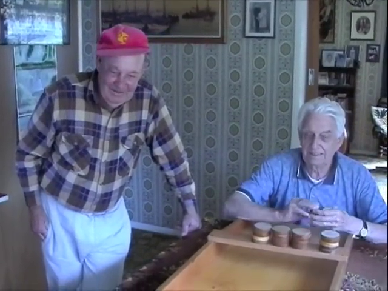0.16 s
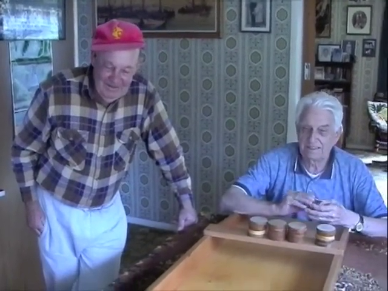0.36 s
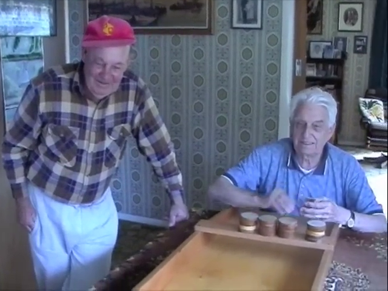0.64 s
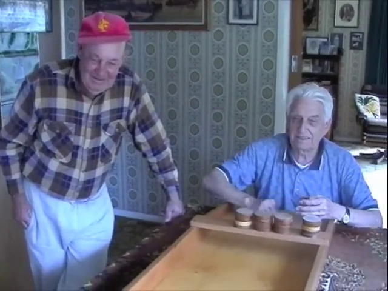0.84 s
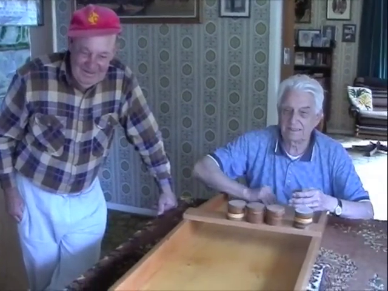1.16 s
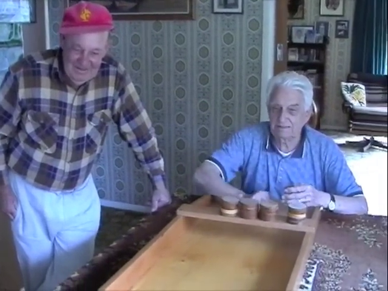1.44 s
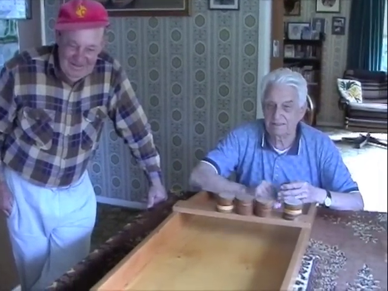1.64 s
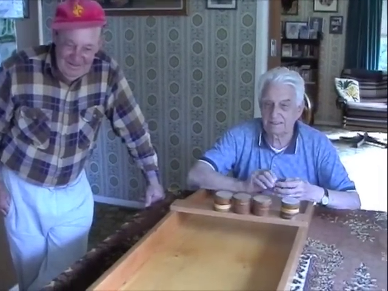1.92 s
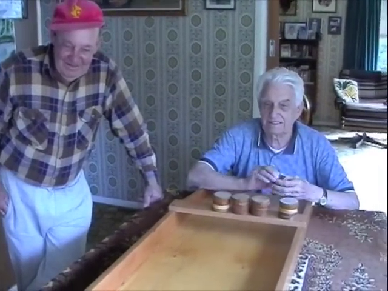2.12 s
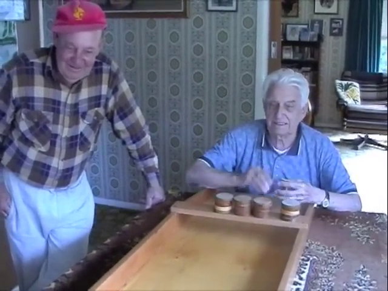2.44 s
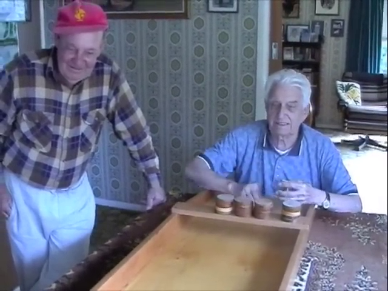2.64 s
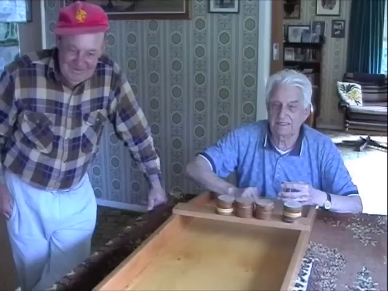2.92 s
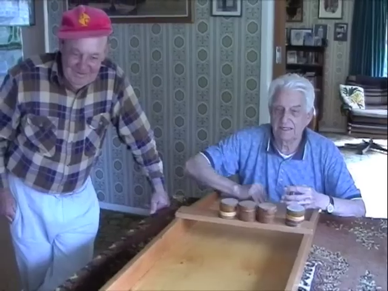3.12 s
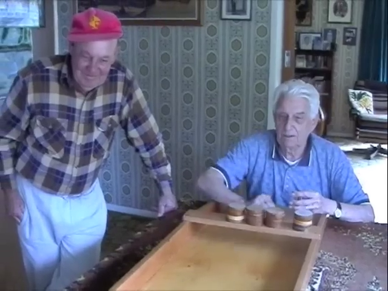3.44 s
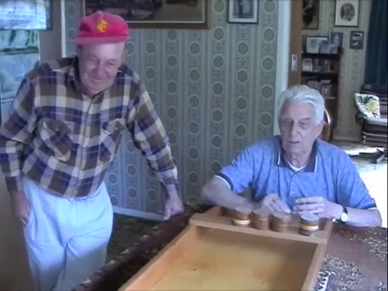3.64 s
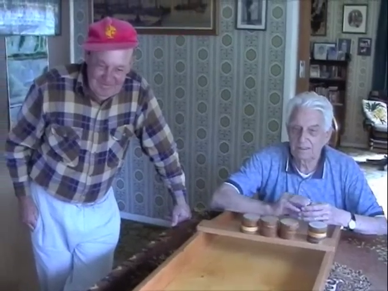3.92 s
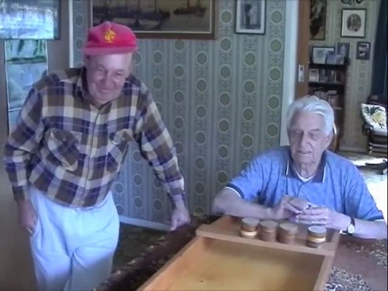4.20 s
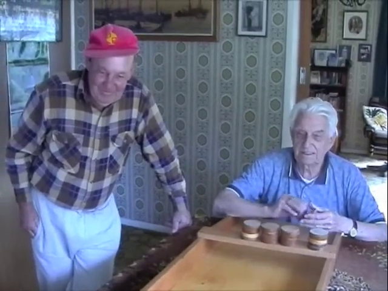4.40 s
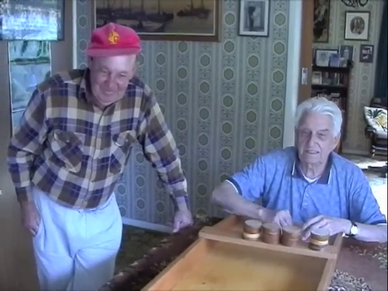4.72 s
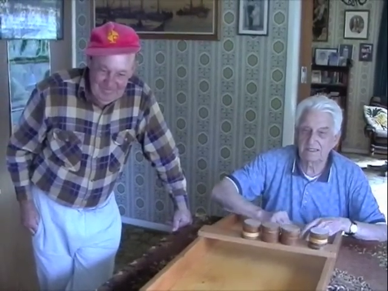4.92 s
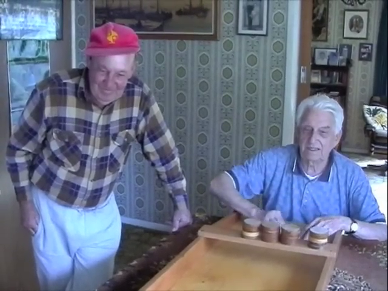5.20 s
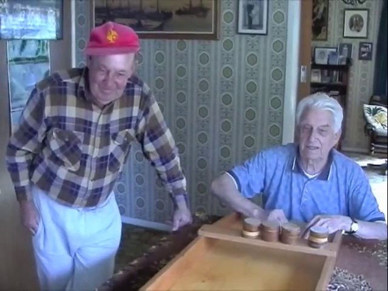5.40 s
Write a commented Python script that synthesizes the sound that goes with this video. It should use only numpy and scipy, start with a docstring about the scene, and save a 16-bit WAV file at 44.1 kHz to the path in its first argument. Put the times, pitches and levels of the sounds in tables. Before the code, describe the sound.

In a quiet living room, wooden game discs are set down with sharp clacks and pushed sliding along a long board, striking its end.

```python
"""Wooden discs on a long game board

A living room, in stereo, the board well ahead of its room tail. Discs are set down, dragged and pushed off.
Each blow is a filtered crack, then dying modes and noise of the board, and the soft tail of the room.
A sliding disc is grainy noise that hisses, wobbles and hits the far end; sleeves rustle over a quiet floor.
The camera limits the loudest peaks, and three times its sound cuts out for an instant."""
import sys
import numpy as np
from scipy import signal
from scipy.fft import rfft, irfft
from scipy.io import wavfile
from scipy.ndimage import uniform_filter1d, minimum_filter1d

SR = 44100
rng = np.random.default_rng(int(sys.argv[2]) if len(sys.argv) > 2 else 0)


def generate_wav(signal):
    """Clip the signal to [-1, 1] and save it as 16-bit WAV at the path in sys.argv[1]."""
    frames = np.transpose(np.atleast_2d(signal))
    scaled = np.clip(frames, -1, 1) * 32767
    pcm = np.round(scaled).astype(np.int16)
    wavfile.write(sys.argv[1], SR, pcm)


N = 245195
TIME = np.arange(N) / SR  # s


def amp(db):
    """Decibels to gain."""
    return 10 ** (np.asarray(db) / 20)


def evened(x):
    """Scales to rms 1."""
    return x / np.sqrt(np.mean(x ** 2) + 1e-20)


def read(points, hz):
    """Reads a table on a log-frequency axis."""
    f, value = np.transpose(points)
    return np.interp(np.log(hz + 1), np.log(f + 1), value)


def bins(x):
    """The frequencies of a signal's spectrum, in Hz."""
    return np.fft.rfftfreq(x.shape[-1], 1 / SR)


def coloured(x, db):
    """Filters by a gain in dB for each frequency."""
    return irfft(rfft(x) * amp(db), x.shape[-1])


def causal(x, db):
    """Filters by a gain in dB for each frequency, with no sound before the attack (minimum phase)."""
    log_gain = np.log(amp(np.r_[db, db[-2:0:-1]]))
    response = np.exp(signal.hilbert(log_gain).conj())[:len(db)]
    return irfft(rfft(x) * response)


def add(mix, s, sound):
    """Mixes a sound in at s seconds."""
    part = mix[:, max(round(s * SR), 0):][:, :sound.shape[1]]
    part += sound[:, :part.shape[1]]


def spread(pair, width):
    """Makes left and right from two unrelated signals, as mid and side."""
    mid = pair[0]
    side = coloured(pair[1], read(width, bins(pair)))
    return np.array([mid + side, mid - side])


def stroke(start, length, db, power):
    """Gain over one move of the hand, which speeds up and slows down in an arch."""
    along = np.clip((TIME - start) / length, 0, 1)
    return amp(db) * (4 * along * (1 - along)) ** power


# stereo width of wood, room tail and cloth: (f/Hz, side against mid level/dB)
SOUND_WIDTH = [(60, -37.5), (200, -12), (380, -29.5), (700, -17), (1300, -6.5), (2400, -4), (4400, -5.5),
               (8100, 1.5), (15000, -4)]


def tail(t60, size):
    """Stereo noise in which each band dies at its own speed."""
    noise = spread(rng.standard_normal((2, size)), SOUND_WIDTH)
    hz, t, z = signal.stft(noise, SR, nperseg=256)
    decay_db = -60 * t / np.maximum(read(t60, hz), .02)[:, None]
    return signal.istft(z * amp(decay_db), SR, nperseg=256)[1][:, :size]


# colour of the quiet room noise: (f/Hz, relative level/dB per Hz)
FLOOR_COLOUR = [(15, -36.5), (25, -3), (141, -7), (175, -8), (451, -3), (887, -12), (1160, -9.5),
                (2280, -15), (3340, -16.5), (6050, -19), (7310, -15.5), (8590, -18), (16000, -22.5)]
# stereo width of the room noise: (f/Hz, side against mid level/dB)
FLOOR_SIDE = [(60, 0), (400, -9), (1500, -1.5), (8000, 1.5)]
# the camera's own steady tones: (f/Hz, rms level/dB)
CAMERA_TONES = [(2099, -77.5), (2401, -76), (2848, -78), (3451, -74), (7499, -75), (10799, -76.5),
                (15622, -91)]
FLOOR_DB = -57  # rms


def background():
    """Steady coloured room noise with the thin whine of the camera, a few pure tones."""
    noise = spread(rng.standard_normal((2, N)), FLOOR_SIDE)
    floor = evened(coloured(noise, read(FLOOR_COLOUR, bins(noise))))
    whine = sum(amp(db) * np.sqrt(2) * np.sin(2 * np.pi * (hz * TIME + rng.random()))
                for hz, db in CAMERA_TONES)
    return amp(FLOOR_DB) * floor + whine


# decay of the room: (f/Hz, t60/s)
ROOM_DECAY = [(100, 0.27), (500, 0.65), (1500, 0.43), (4000, 0.39), (12000, 0.25)]


def room(x):
    """The soft tail of a furnished room: diffuse noise that builds up over some 9 ms, then dies."""
    response = tail(ROOM_DECAY, size=2 ** 15)
    response = response * (1 - np.exp(-(TIME[:response.shape[1]] / 0.009) ** 2))
    response = response / np.linalg.norm(response[0])
    return signal.fftconvolve(x.mean(0)[None], response, axes=1)[:, :N]


# colour of the cloth: (f/Hz, relative level/dB per Hz)
CLOTH_COLOUR = [(100, -23), (400, 12), (900, 3.5), (2500, -12), (8000, -27.5), (16000, -31.5)]
# a sleeve brushes the table: (start t/s, length t/s, level/dB)
SLEEVE_BRUSHES = [(0.364, 0.58, -60), (0.674, 0.52, -55.5), (2.68, 0.045, -54.5), (4.101, 0.51, -57.5)]


def sleeves():
    """A faint rustle of cloth: coloured noise that swells and fades with the speed of the arm."""
    noise = spread(rng.standard_normal((2, N)), SOUND_WIDTH)
    cloth = evened(coloured(noise, read(CLOTH_COLOUR, bins(noise))))
    return sum(stroke(*row, power=1) for row in SLEEVE_BRUSHES) * cloth


# the disc squeaks as it is pushed off, falling in pitch
SQUEAK_S, SQUEAK_LENGTH_S, SQUEAK_DB = 1.402, 0.027, -21.5
SQUEAK_FROM_HZ, SQUEAK_TO_HZ = 1600, 1107


def squeak():
    """Stick and slip: a short, rough, falling tone with its third harmonic."""
    hz = np.interp(TIME, [SQUEAK_S, SQUEAK_S + SQUEAK_LENGTH_S], [SQUEAK_FROM_HZ, SQUEAK_TO_HZ])
    jitter = .14 * evened(uniform_filter1d(rng.standard_normal(N), size=30))
    turns = np.cumsum(hz * (1 + jitter)) / SR
    tone = np.sin(2 * np.pi * turns) + amp(-9) * np.sin(2 * np.pi * 3 * turns)
    return stroke(SQUEAK_S, SQUEAK_LENGTH_S, SQUEAK_DB, power=1.1) * tone


# resonances of wood rubbing on wood: (f/Hz, width f/Hz, peak level/dB)
RUB_RESONANCES = [(705, 35, 7.5), (1340, 30, 6), (2040, 86, 2), (2516, 140, 4), (3520, 24, 10.5),
                  (4130, 91, 1), (4320, 26, 2)]


def rubbing(colour, per_s, grain_db, smooth):
    """Tiny collisions of the wood grain over a smooth hiss, through fixed resonances, in uneven patches."""
    size = amp(grain_db * np.minimum(rng.exponential(1, N), 5))
    collisions = evened(size * (rng.random(N) < per_s / SR))
    grains = collisions * rng.choice([-1, 1], (2, N))
    hiss = smooth * rng.standard_normal((2, N))
    hz, t, z = signal.stft(spread(grains + hiss, SOUND_WIDTH), SR, nperseg=512)
    peaks_db = sum(db / (1 + (2 * (hz - f) / width) ** 2) for f, width, db in RUB_RESONANCES)
    # random patches of frequency and time, louder or softer
    patches = uniform_filter1d(rng.standard_normal(z.shape[1:]), size=7, axis=0)
    patches_db = 2.2 * evened(uniform_filter1d(patches, size=7, axis=1))
    z = z * amp((read(colour, hz) + peaks_db)[:, None] + patches_db)
    return evened(signal.istft(z, SR, nperseg=512)[1][:, :N])


# colour of a disc rubbing under the fingers: (f/Hz, relative level/dB per Hz)
DRAG_TIMBRE = [(120, -48), (200, -24), (282, -17.5), (383, 0), (476, 4.5), (602, -21), (659, -2.5),
               (849, 1), (1040, 0), (1380, 2.5), (1850, -5), (4390, 1), (5550, -9), (7550, -8),
               (15000, -38)]
# a disc is dragged under the fingers: (start t/s, length t/s, relative level/dB)
DRAG_MOVES = [(1.15, .245, -34), (1.379, 0.12, -27.5), (2.95, .14, -40.5), (3.091, .2, -31),
              (3.227, 0.16, -30), (3.362, 0.079, -24), (4.823, 0.14, -39.5), (5.07, .16, -42.5),
              (5.465, 0.25, -33.5)]
DRAG_POWER = 1.63  # the arch of each move is raised to this power


def drags():
    """A disc held under the fingers gives a finer, even rasp that follows the speed of the hand."""
    rasp = rubbing(DRAG_TIMBRE, per_s=6400, grain_db=-1.5, smooth=0.57)
    return amp(-3.0) * rasp * sum(stroke(*row, DRAG_POWER) for row in DRAG_MOVES)


# a wobbling disc slaps its rim down ever faster: first slap, first interval, each interval against the last
WOBBLE_START_S, WOBBLE_PERIOD_S, WOBBLE_SHRINK = 1.494, .063, .935


def wobbles(count):
    """The moments at which the wobbling rim comes down."""
    intervals = WOBBLE_PERIOD_S * WOBBLE_SHRINK ** np.arange(count - 1)
    return WOBBLE_START_S + np.r_[0, np.cumsum(intervals)]


# loudness follows speed to these powers (treble share 0 and 1), so the hiss dies before the rumble
BASS_POWER, TREBLE_POWER = 0.73, 1.37
ROCK_S, ROCK_DB = .05, 3  # a slowing disc rocks, and its rumble throbs: period and greatest depth


def slide(t, treble_share, start, push, end, left, db, bright_db):
    """Gain by band and time of one slide: the disc gets up to speed, then friction slows it evenly."""
    slowed = np.clip(1 - left, 0, 1) * np.clip((t - start) / (end - start), 0, 1)
    speed = np.clip((t - start) / push, 0, 1) ** 2 * (1 - slowed) * (t < end)
    rock_db = ROCK_DB * np.sqrt(slowed) * np.cos(2 * np.pi * (end - t) / ROCK_S)
    power = BASS_POWER + (TREBLE_POWER - BASS_POWER) * treble_share
    level_db = db + treble_share * bright_db + (1 - treble_share) * rock_db
    return amp(level_db) * speed ** power


# colour of a freely sliding disc: (f/Hz, relative level/dB per Hz)
GLIDE_TIMBRE = [(40, -40.5), (150, -62), (260, -16), (420, 4), (750, 1), (1300, -2), (2500, -3.5),
                (4000, -1), (6200, -3.5), (7900, -1.5), (9800, -11), (11400, -21.5), (12900, -16.5),
                (15500, -56)]
# a disc slides freely: (start t/s, time to full speed t/s, end t/s, share of speed left at the end 0-1,
# relative level/dB, brightness level/dB)
FREE_SLIDES = [(0, 0.002, 0.31, 0.01, -25, -17), (1.39, .085, 1.86, 1, -28, -9),
               (1.864, 0.0085, 2.192, 0.07, -29, -11.5), (3.35, 0.034, 3.745, 0.47, -42.5, 6.5),
               (3.745, 0.065, 4.22, 0, -28.5, -7.5)]
WOBBLE_SWELL_DB = 7


def glides(slaps):
    """A free disc hisses while it is fast and rumbles as it slows; its wobble makes the sound throb."""
    rub = rubbing(GLIDE_TIMBRE, per_s=3000, grain_db=3, smooth=.55)
    hz, t, z = signal.stft(rub, SR, nperseg=256)
    treble_share = read([(800, 0.22), (2200, 0.63), (5500, 1)], hz)[:, None]
    gain = sum(slide(t, treble_share, *row) for row in FREE_SLIDES)
    sound = signal.istft(z * gain, SR, nperseg=256)[1][:, :N]
    wobble_db = WOBBLE_SWELL_DB * sum(np.exp(-((TIME - at) / .011) ** 2) for at in slaps)
    return sound * amp(8.0 + wobble_db)


WOBBLE_CHATTER_DB = -25.5  # strength of each tap


def chatter(slaps, count):
    """At each wobble the rim taps the board a few times in quick succession."""
    taps = np.zeros((2, N))
    for s in slaps:
        for delay in .006 * (np.arange(count) - rng.random(count) - .7):
            ping_hz = rng.uniform(1500, 5000)
            blow = knock(WOBBLE_CHATTER_DB, thump_db=-12.5, crack_db=2, tick_db=-4, ring_db=3.0, clack_hz=ping_hz)
            add(taps, s + delay, blow)
    return taps


# the wood right under the disc gives a hollow knock that dies fast: (f/Hz, relative level/dB, t60/s)
HOLLOW_MODES = [(460.3, -4, 0.14), (800, -3, 0.079), (1075, -5.5, 0.022), (1368, 3.5, 0.057)]


def hollow(t):
    """The brief, low knock at the place of the blow, a few modes of the wood."""
    hz, db, t60 = np.transpose(HOLLOW_MODES)[:, :, None]
    since = np.maximum(t - .045 / np.sqrt(hz), 0)  # slow bending waves arrive later
    level = amp(db - 60 * since / t60) * (1 - np.exp(-since * hz))
    return (level * np.sin(2 * np.pi * hz * since)).sum(0)


# decay of the board: (f/Hz, t60/s)
BOARD_DECAY = [(100, 0.6), (500, 0.21), (1800, 0.22), (4500, 0.15), (12000, 0.22)]


def ring(modes, t, scatter_db):
    """Dying modes; the place of the blow and the load of the discs change their shares and pitch a little."""
    hz, db = np.transpose(modes)[:, :, None]
    share, load = rng.standard_normal((2, len(hz), 1))
    hz = hz * (1 + .008 * load)
    level = amp(db + scatter_db * share - 60 * t / read(BOARD_DECAY, hz))
    return (level * np.sin(2 * np.pi * hz * t)).sum(0)


# the first crack of wood on wood: (f/Hz, relative level/dB per Hz)
CRACK_COLOUR = [(30, -46), (150, -25.5), (280, -7), (460, 3.5), (640, -2.5), (1200, -2), (1900, -3.5),
                (3000, -2.5), (4300, -4), (5800, -9.5), (8200, -25.5), (10500, -34), (13000, -52.5),
                (16000, -58)]
# lasting modes of the board, before scatter: (f/Hz, relative level/dB)
BOARD_MODES = [(422, -6), (475, -11.5), (560, -23), (680, -1), (780, -0.5), (852, -3.5), (935, -1.5),
               (1110, -2.5), (1251, -1), (1372, -2.5), (1535, -3.5), (1648, -6.5), (1985, -1.5),
               (2231, -10), (2635, -11.5), (2890, -14), (3480, -11), (3990, -12)]
# the board's crowd of weaker modes: (f/Hz, relative level/dB per Hz)
CLATTER_COLOUR = [(30, -35.5), (130, -32.5), (250, -17), (400, 5), (800, 4.5), (1400, -1.5), (2200, 0),
                  (3500, -6), (5500, -11.5), (8200, -20.5), (10500, -45), (13000, -58.5), (16000, -64.5)]


def knock(strength_db, thump_db, crack_db, tick_db, ring_db, clack_hz):
    """One blow: a short crack at the contact, then the modes of the whole board."""
    t = np.arange(2 ** 14) / SR
    hz = bins(t)
    # one clean impact and a few milliseconds of dying noise that roughens the crack
    impact = (t == 0) + amp(-20) * rng.standard_normal(len(t)) * np.exp(-t / .003)
    # bending waves run faster at high pitch, so the treble arrives first
    bent = irfft(rfft(impact) * np.exp(-2j * np.pi * 0.1193 * np.sqrt(hz)))
    clack_db = 8 / (1 + (np.log2((hz + 1) / clack_hz) / .17) ** 2)  # a peak, width in octaves
    contact = amp(31.0) * causal(bent, read(CRACK_COLOUR, hz) + clack_db)
    modes = ring(BOARD_MODES, t, scatter_db=2.5)
    board = amp(-10.0) * modes * (1 - np.exp(-t / 0.0014)) + amp(-7.5) * hollow(t)
    crowd = tail(BOARD_DECAY, size=len(t)) * (1 - np.exp(-t / 0.00035))
    clatter = amp(6.5) * causal(crowd, read(CLATTER_COLOUR, hz) + .5 * clack_db)
    hardness_db = read([(450, thump_db), (900, 0), (1700, 0.0013),
                        (3200, crack_db), (6000, crack_db), (9000, tick_db)], hz)
    sound = causal(contact + amp(ring_db) * (board + clatter), strength_db + hardness_db)
    return sound * np.minimum((t[-1] - t) / .05, 1)  # fade at the very end


# discs are set down or knocked together near the hand: (t/s, strength level/dB, thump near 400 Hz level/dB,
# hardness level/dB, after-ring level/dB, pitch of the clack f/Hz)
HAND_CLACKS = [(0.9435, -11.5, -1.5, -7.5, -1.5, 4130), (1.0496, -27.5, -2.5, -9, 3, 800),
               (1.09, -22, 0, -10.5, -2.5, 764), (1.11, -32, 0, -2.5, -7, 1210),
               (1.387, -39.5, -8, -12.5, -0.5, 1500), (2.737, -11, 0, -9.5, 1, 3570),
               (2.8803, -15, -2, 3.5, -3, 2570), (4.775, -8.5, -4.5, -5.5, -3.5, 1220),
               (4.937, -15, -1, 4.5, -3.5, 1300), (5.1945, -11, -5.5, -2, -2, 2340),
               (5.219, -22.5, 0, -3, 4, 2260), (5.3031, -19, -7.5, -3, 4, 2250),
               (5.338, -32.5, 2, -0.5, 10, 910)]
# a sliding disc strikes a rail or the far end: (t/s, strength level/dB, hardness level/dB, pitch of the clack f/Hz)
RAIL_STRIKES = [(1.7451, -26, 5, 2910), (1.7844, -25.5, 4, 800), (1.8637, -18.5, -1.5, 2400),
                (1.8769, -26, 3, 3100), (1.915, -28.5, -0.5, 3300), (3.745, -18.5, -2.5, 990),
                (3.7532, -24.5, -0.5, 2750)]
STRIKE_THUMP_DB, STRIKE_TICK_DB, STRIKE_RING_DB = -9.5, -5.5, 4  # the tick is relative to the hardness
# disc clicks against disc, rim to rim: (t/s, strength level/dB)
RIM_CLICKS = [(1.7447, -30), (1.757, -23.5), (1.7706, -35), (3.760, -24.5), (3.7638, -33)]
# a slowing disc rocks down on its face with a low bump: (t/s, strength level/dB)
FACE_BUMPS = [(.003, -31), (.038, -32.5), (2.136, -46.5), (3.8395, -20.5), (3.9129, -24)]


def blows():
    """Full clacks near the hand, thinner ringing strikes down the board, bright clicks and low bumps."""
    out = np.zeros((2, N))
    for s, db, thump_db, hard_db, ring_db, hz in HAND_CLACKS:
        add(out, s, knock(db, thump_db, hard_db, hard_db + 3.5, ring_db, hz))
    for s, db, hard_db, hz in RAIL_STRIKES:
        add(out, s, knock(db, STRIKE_THUMP_DB, hard_db, hard_db + STRIKE_TICK_DB, STRIKE_RING_DB, hz))
    for s, db in RIM_CLICKS:
        add(out, s, knock(db, thump_db=-2, crack_db=5.0, tick_db=24, ring_db=-0.5, clack_hz=9070))
    for s, db in FACE_BUMPS:
        add(out, s, knock(db, thump_db=0.5, crack_db=-6, tick_db=7, ring_db=-3.5, clack_hz=650))
    return out


def scene():
    """All that happens on the board, in its room."""
    slaps = wobbles(count=4)
    wood = glides(slaps) + chatter(slaps, count=3) + drags() + squeak() + blows()
    return wood + amp(-13.0) * room(wood) + sleeves() + background()


# the sound cuts out: (from t/s, to t/s)
CUT_OUTS = [(1.7048, 1.7443), (1.8248, 1.8641), (3.7052, 3.7442)]
EDGE_HZ = 15850  # upper band limit


def record(dry):
    """A fast limiter holds the peaks; at each gap the sound drops and dies away; then the band limit."""
    allowed = np.minimum(1, .88 / (abs(dry).max(0) + 1e-9))
    gain = uniform_filter1d(minimum_filter1d(allowed, size=45), size=45)  # about 1 ms
    for start, end in CUT_OUTS:
        inside = (TIME >= start) & (TIME < end)
        gain[inside] = amp(-20.5 - 1030 * (TIME[inside] - start))  # a drop, then a fall in dB per s
    low_pass = signal.firwin(511, EDGE_HZ, window=("kaiser", 9), fs=SR)
    return signal.oaconvolve(dry * gain, low_pass[None], "same")


dry = scene()
out = record(dry)
generate_wav(out)
```